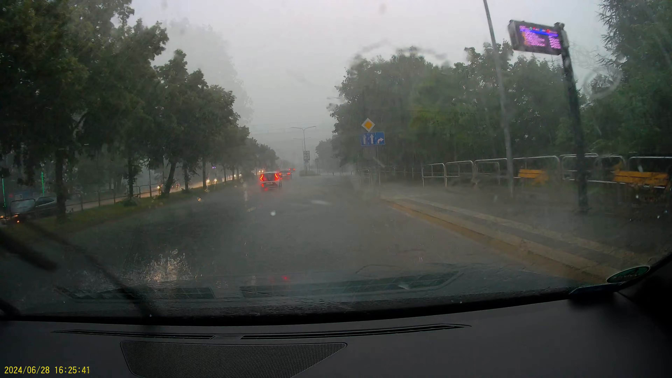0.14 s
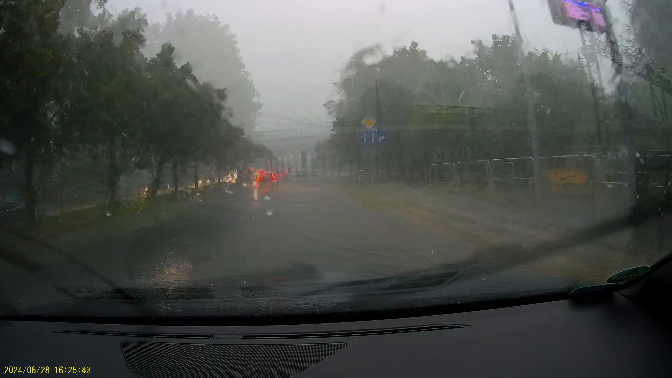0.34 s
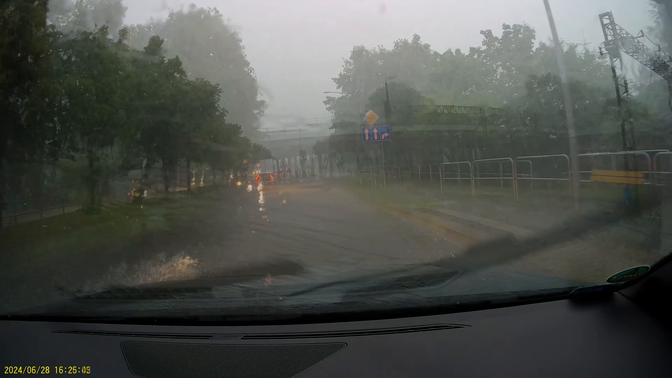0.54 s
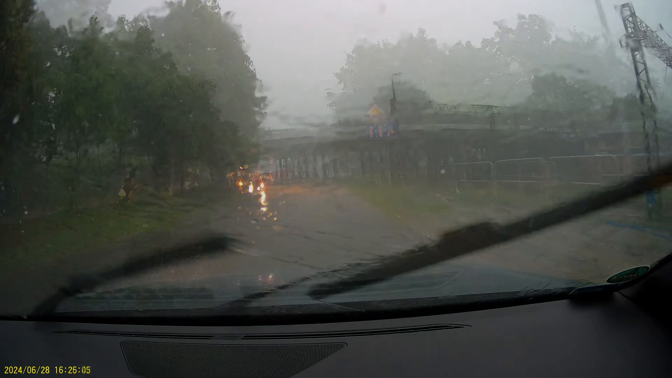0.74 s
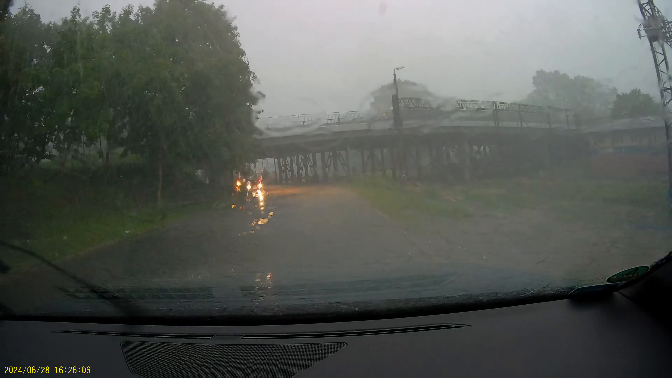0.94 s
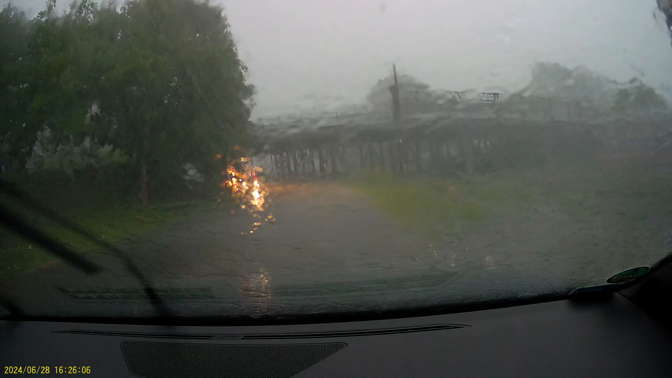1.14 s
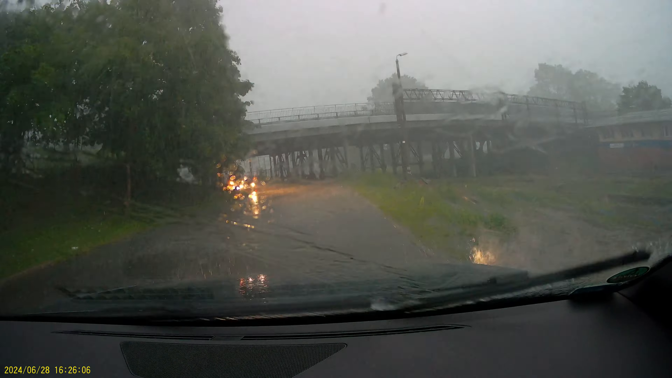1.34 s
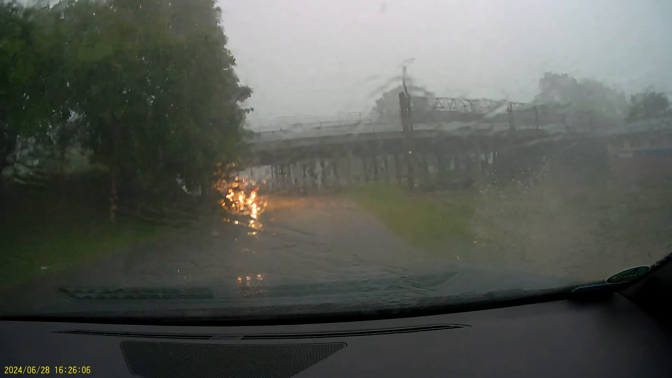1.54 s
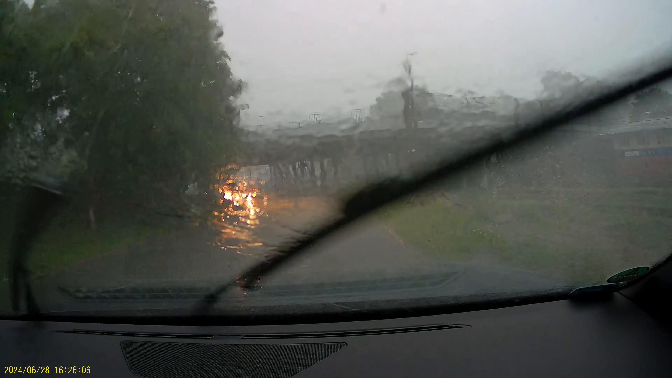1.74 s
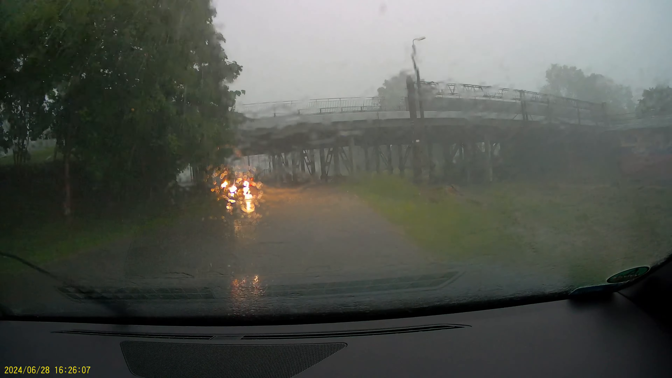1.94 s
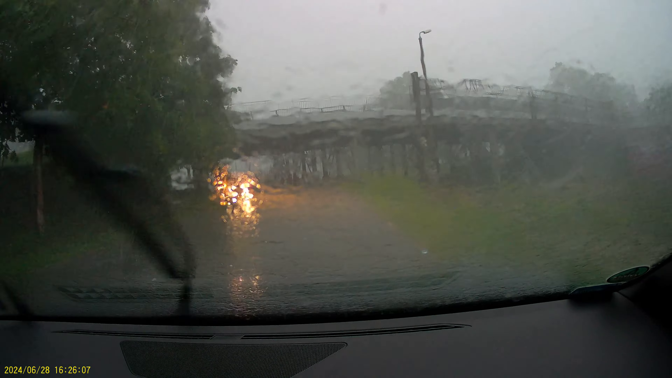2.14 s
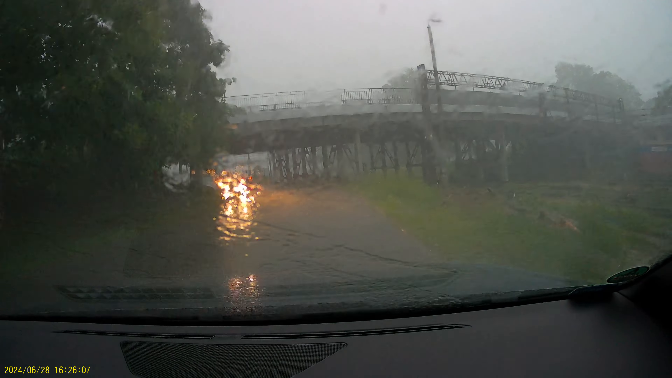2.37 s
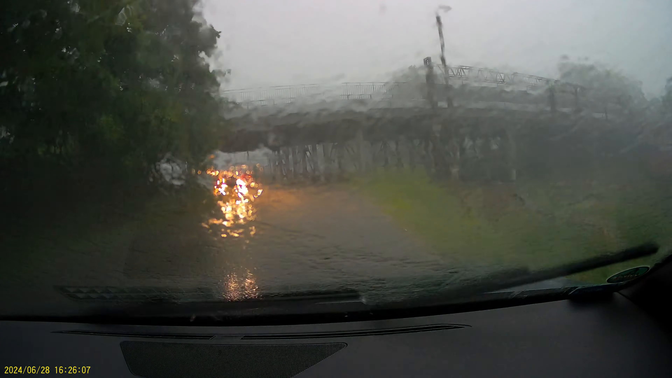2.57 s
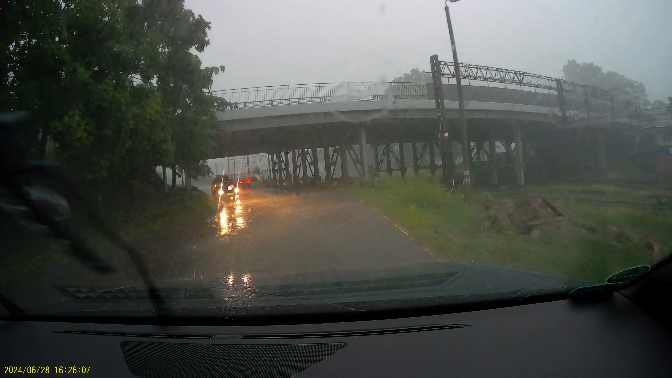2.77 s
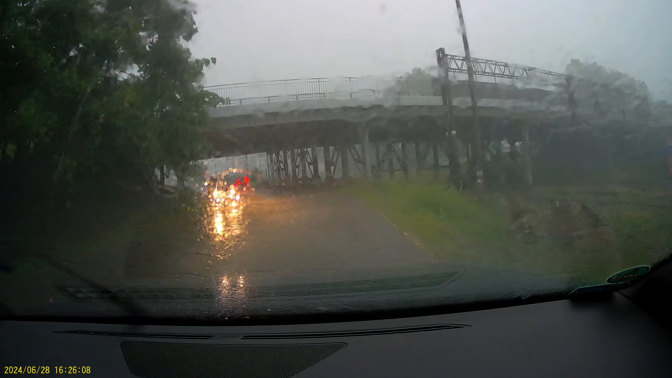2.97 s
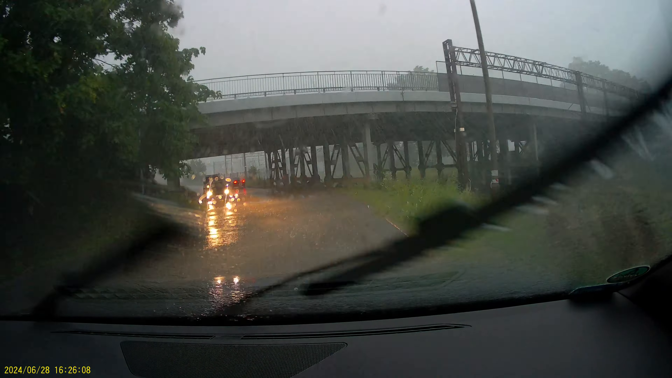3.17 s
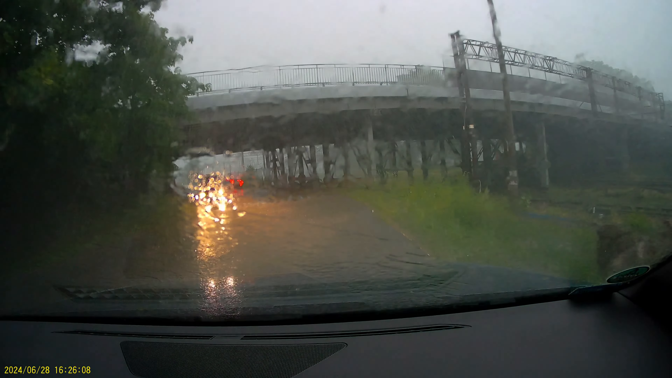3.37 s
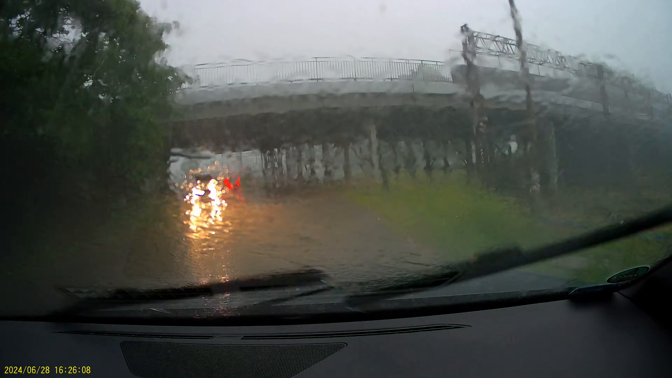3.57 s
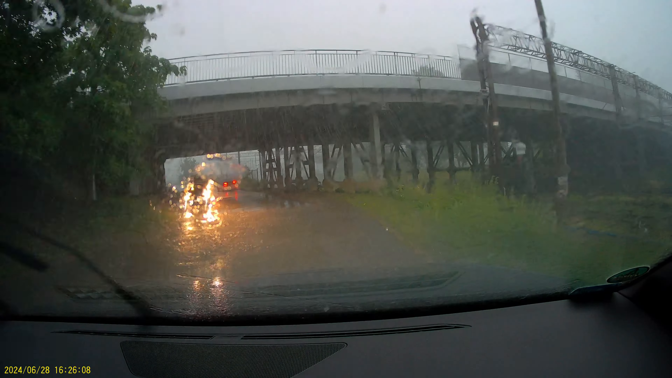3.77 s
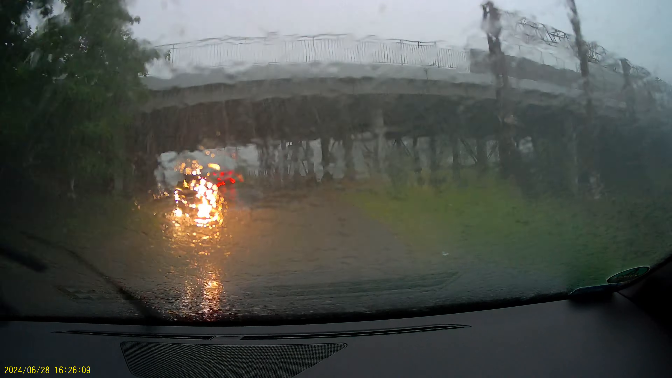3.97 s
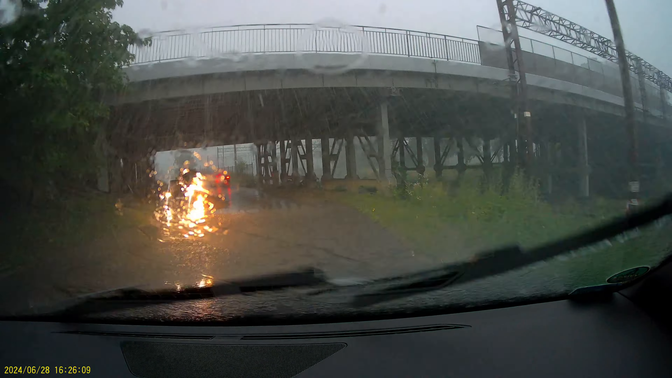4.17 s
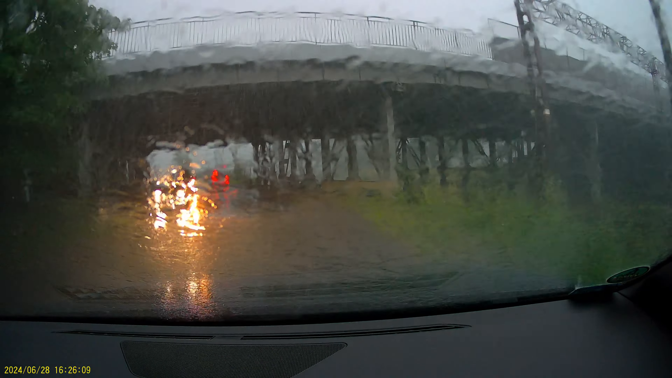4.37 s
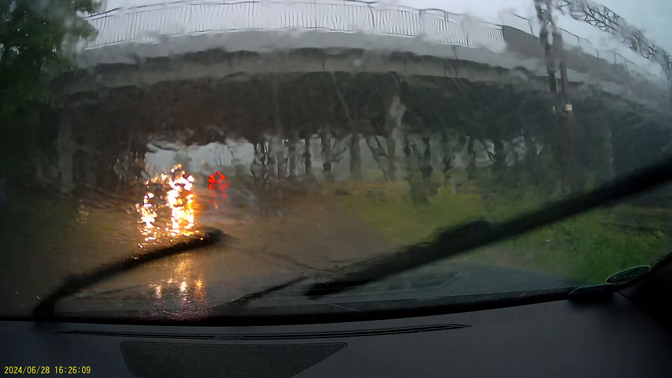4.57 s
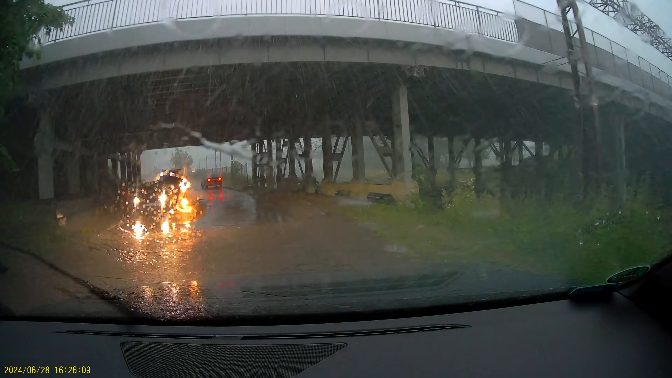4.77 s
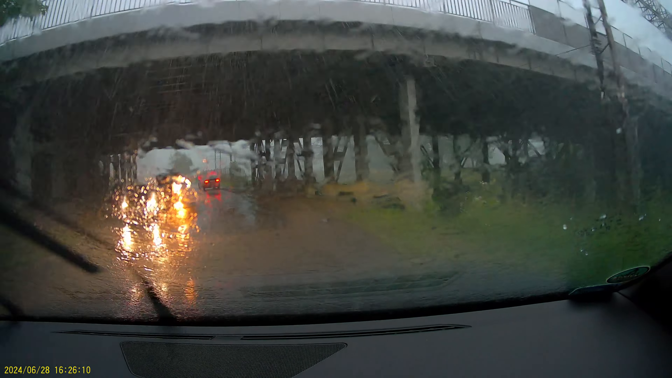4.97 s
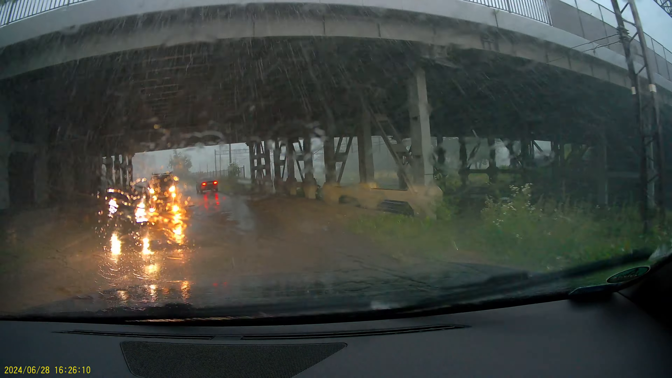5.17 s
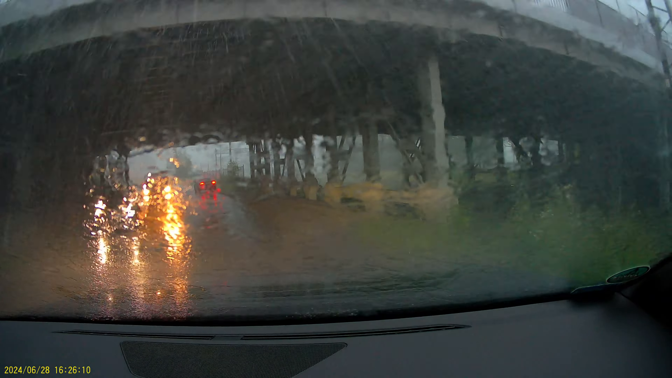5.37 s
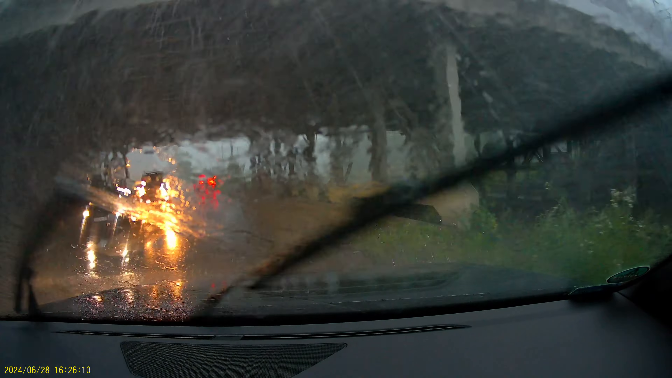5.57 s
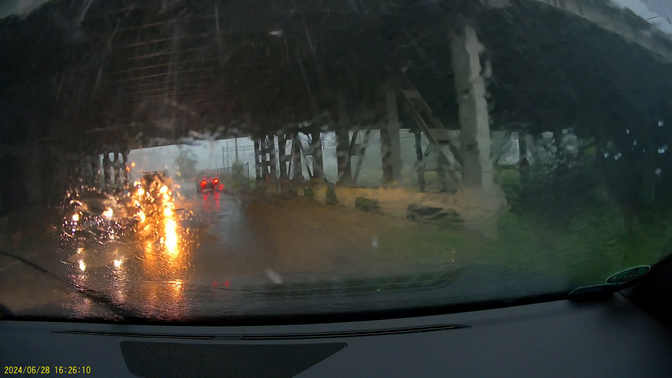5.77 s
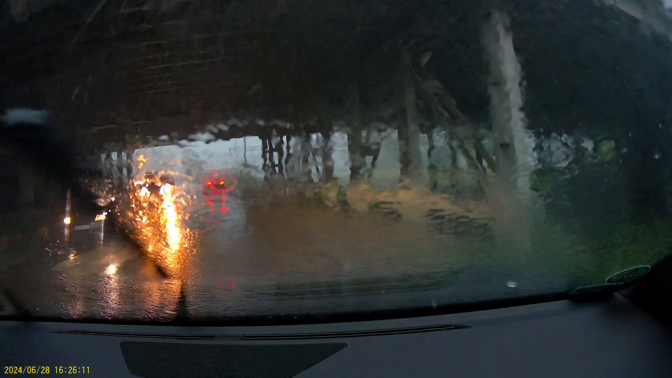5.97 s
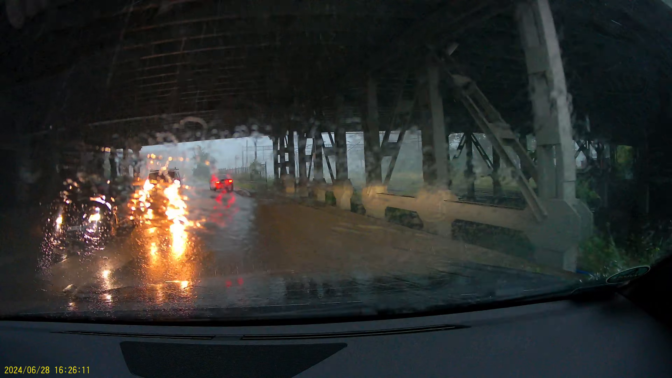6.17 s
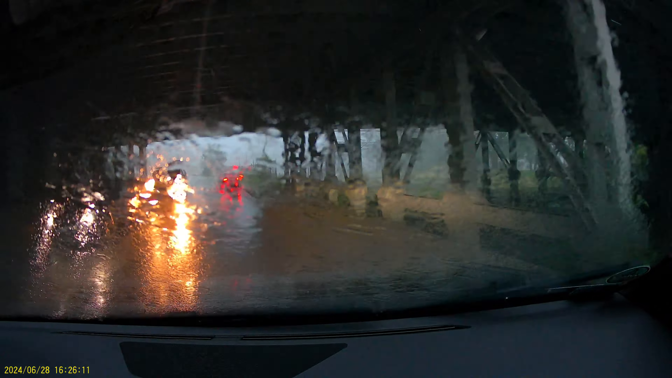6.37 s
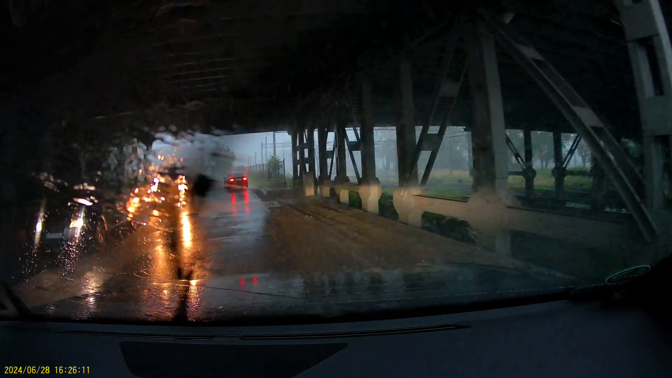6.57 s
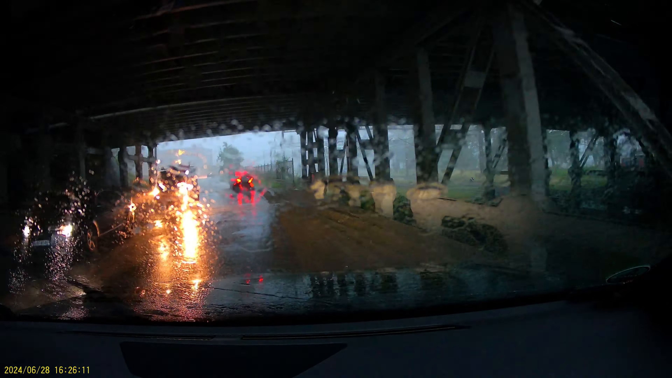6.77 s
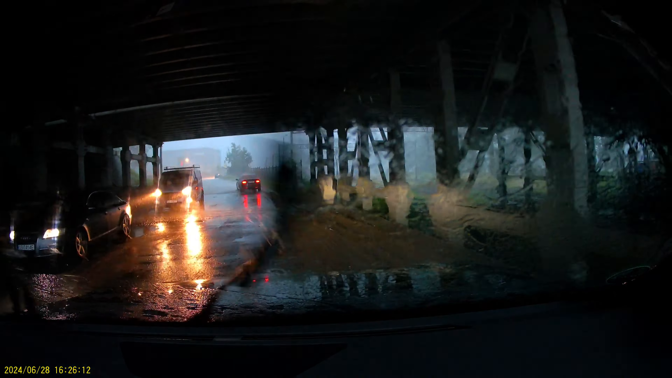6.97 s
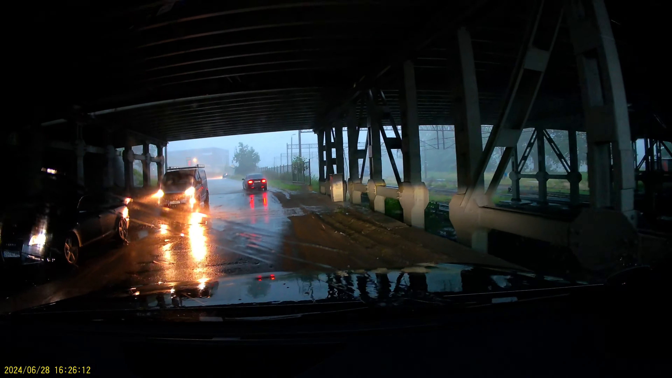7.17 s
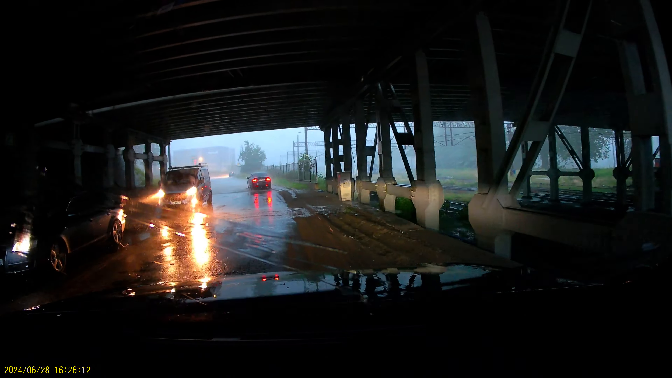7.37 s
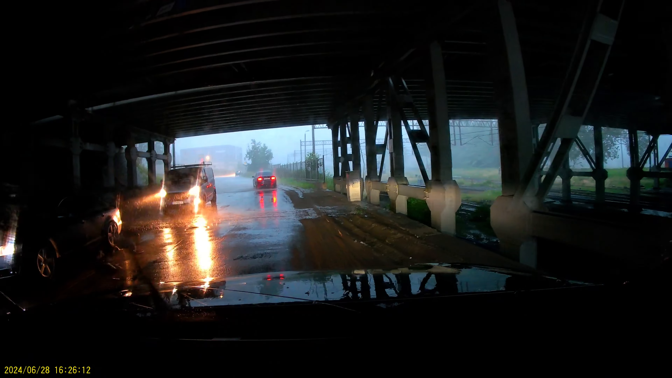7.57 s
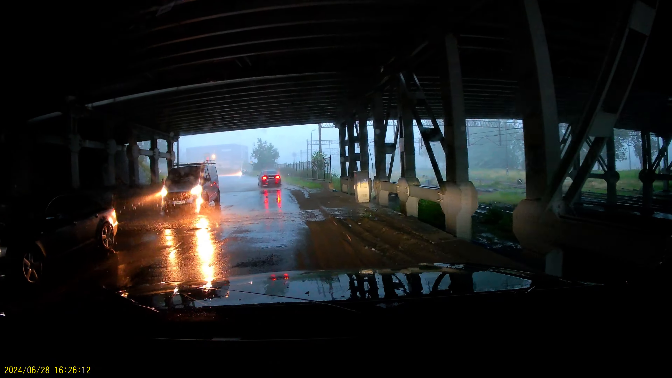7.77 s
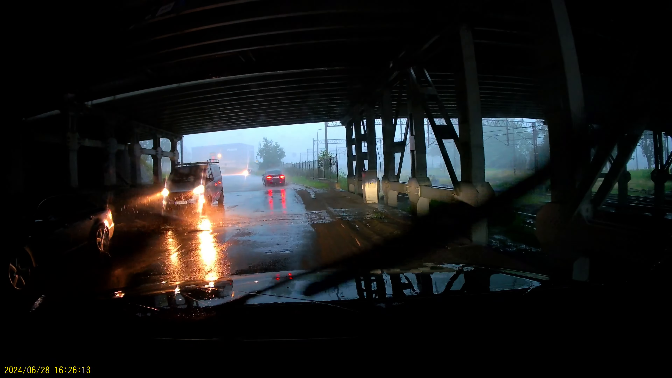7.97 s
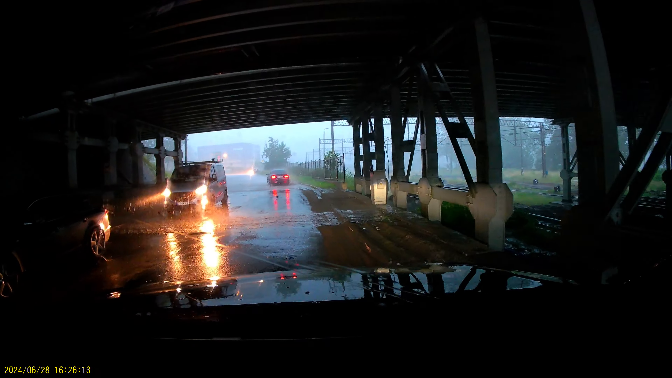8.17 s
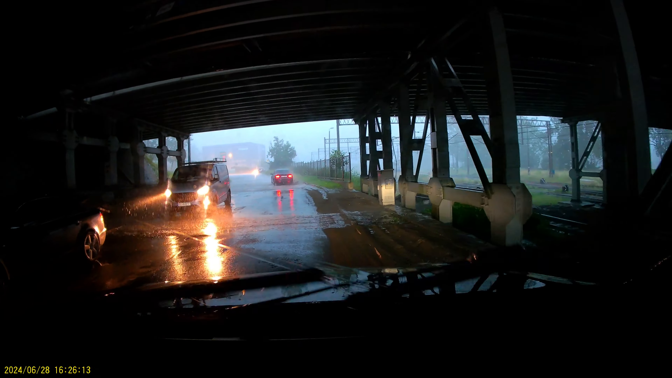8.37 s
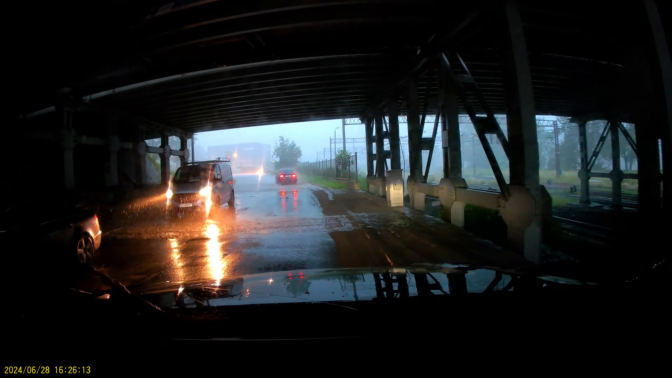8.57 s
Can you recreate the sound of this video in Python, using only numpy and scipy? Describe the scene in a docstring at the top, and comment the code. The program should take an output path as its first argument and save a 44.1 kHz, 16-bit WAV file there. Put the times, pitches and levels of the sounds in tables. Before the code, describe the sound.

Close cabin perspective: a loud continuous roar of rain on metal and glass, studded with hailstones that snap nearby or thud across the roof. Deep thunder rolls strongest in the first two seconds, over road rumble and wet tyre wash. After about seven seconds shelter overhead cuts the rain; the quiet interior exposes wipers clacking at each turn and brief squeaks on drying glass.

```python
"""Rain and hail drum on the roof and windscreen of a car driving through a storm, heard from inside:
drops and stones ring the many modes of the car shell. Thunder and road rumble boom as resonant noise,
tyres wash as shaped noise, wipers thump as decaying modes at each turn. Near the end the car rolls
under a bridge: the drumming stops, the thumps come through and the rubber squeaks on the drying glass."""
import sys
import numpy as np
from scipy import signal
from scipy.fft import rfft, irfft, next_fast_len
from scipy.io import wavfile
from scipy.ndimage import uniform_filter1d

SR = 44100
rng = np.random.default_rng(int(sys.argv[2]) if len(sys.argv) > 2 else 0)


def unload_wav(signal):
    """Save mono or channel-first audio to the path in sys.argv[1] as 16-bit WAV at rate SR, clipped to [-1, 1]."""
    wavfile.write(
        sys.argv[1],
        SR,
        np.round(np.clip(np.atleast_2d(signal).T, -1, 1) * 32767).astype(np.int16),
    )


N = 380583

# Response of the car shell heard inside: (frequency [Hz], level per Hz [dB])
SHELL_RESPONSE = [(82, -49.5), (140, -4), (218, -3), (319, -9), (383, 2), (507, -4.5), (649, -3),
                  (844, -11), (1010, -10.5), (1280, -14.5), (1740, -16), (1930, -21), (4460, -31.5),
                  (5810, -34.5), (7200, -36), (9360, -34), (15800, -120)]
# Ring of the shell modes: (frequency [Hz], T60 [s])
SHELL_DECAY = [(100, 0.16), (500, 0.24), (1500, 0.097), (6000, 0.11)]

# Rain, cut off by the bridge: (time [s], drumming on the roof [dB], patter on the glass [dB])
RAIN_LEVELS = [(0.0, -17, -27), (0.33, -23.5, -37), (0.75, -22, -33.5), (1.2, -22, -38), (1.8, -22.5, -33),
               (2.4, -24, -34), (3.2, -25.5, -37.5), (3.6, -24.5, -33.5), (3.75, -21, -32),
               (3.95, -22.5, -33), (4.23, -24, -34.5), (4.9, -24, -35.5), (5.5, -20, -31),
               (6.0, -23.5, -38), (6.6, -24, -36.5), (6.75, -24.5, -43.5), (6.88, -33, -64),
               (6.99, -30, -52), (7.08, -41.5, -58), (7.24, -43, -62), (7.43, -53.5, -65),
               (7.96, -58.5, -73.5), (8.63, -55.5, -75)]
SMALL_HAIL_PER_S, SMALL_HAIL_DB = 2.9, -20.5  # the rest of the hail, level re the roof drumming

# Wash of the wet road: (frequency [Hz], level per Hz [dB])
ROAD_SPECTRUM = [(15, -33), (25, 1), (55, -8.5), (193, -17.5), (251, -15.5), (319, -24.5), (436, -18.5),
                 (504, -30), (626, -28), (897, -49), (2500, -53.5), (4500, -58.5), (6440, -57.5),
                 (7800, -75), (10100, -84), (17200, -120)]
ROAD_DB = -38  # rms of the wash
ROAD_FADE_DB_PER_S, SHELTER_S = 2.5, 7.6  # the wash fades as the car slows under the bridge

# Road rumble and far thunder: (time [s], body boom [dB], cabin boom [dB])
RUMBLE_LEVELS = [(0.0, -30.5, -22), (0.7, -23.5, -29.5), (1.4, -18, -26), (1.8, -27, -26),
                 (2.5, -27.5, -27), (3.2, -28.5, -27), (3.6, -31.5, -31), (4.1, -26.5, -31.5),
                 (4.6, -29.5, -29.5), (5.4, -24, -28.5), (6.0, -27, -33), (6.8, -24, -30),
                 (7.2, -29.5, -34.5), (7.5, -36, -39.5), (7.851, -41, -43.5), (8.63, -43, -57.5)]
# Single booms of the body and cabin, from thunder claps and jolts of the car: # (time at its top [s], body boom
# [dB], cabin boom [dB], length [s])
BOOMS = [(0.082, -19, -28, 0.046), (0.382, -18, -39, 0.1), (0.543, -42, -22, 0.19),
         (0.973, -19.5, -17.5, 0.17), (1.167, -8, -17.5, 0.11), (1.393, -15, -12.5, 0.052),
         (1.473, -6, -20, 0.09), (1.555, -7.5, -12.5, 0.055), (1.631, -7, -37, 0.048),
         (1.937, -38, -21, 0.18), (2.225, -24, -29, 0.14), (2.602, -40, -22, 0.14),
         (2.962, -38, -19.5, 0.09), (3.12, -23, -21, 0.06), (3.843, -18, -22, 0.044),
         (4.078, -22, -46, 0.055), (4.814, -24, -26, 0.046), (5.6, -20, -37, 0.069),
         (5.846, -22, -30, 0.071), (6.276, -23.5, -27, 0.12), (6.95, -19.5, -26.5, 0.12)]
# Body and cabin resonance: (frequency [Hz], nominal width [Hz])
BOOM_RESONANCES = [(32.5, 17.6), (108, 27)]

# Modes of wiper arm and screen, lowest first: (frequency [Hz], level [dB], T60 [s])
WIPER_MODES = [(118.3, -1.5, 0.2), (178, 1.5, 0.098), (262.6, 2.5, 0.054), (353, -5, 0.061),
               (430, -5, 0.076), (566, -9.5, 0.054), (720, -16, 0.032), (1000, -22, 0.03)]
WIPE_S, FIRST_WIPE_S = .958, -.513  # one sweep out and back; start of the first
# The blades flip at both ends of a sweep: (time into the sweep [s], flip level [dB], clack re flip [dB])
WIPER_TURNS = [(0.0, -26.5, 2), (.041, -16.5, -9), (0.081, -24, -13), (0.491, -23.5, -2), (.503, -16, -6),
               (0.525, -20, -14)]
SCUFF_T60_S = .12  # the rubber scuffs as it lands, so the clack is rough
JOLT_HZ, JOLT_DB, JOLT_T60_S = 48, -6, 0.099  # each flip also jolts the body, level re flip

# Loudest hailstones: (time [s], nominal crack peak [dB], thud peak re crack [dB], tick re crack [dB],
# brightness of the tick [0-1], nearness to the listener [0-1])
HAILSTONES = [(0.063, -27, 4, -2, .8, .3), (0.137, -25, 0, 0.5, 0.62, 0.56),
              (0.176, -19.5, 14, -16, 0.37, .1), (0.252, -29, -7, -3, 0.28, 0.73),
              (0.3232, -26, 8, -20, .3, 0.37), (0.376, -13, 6.5, -21, 0.86, 0.086),
              (0.392, -19, -1, -20, 0.76, .15), (0.4572, -22, 12, -14, 0.72, .1),
              (0.513, -17.5, 5, -17, 0.21, .15), (0.5175, -21, 18, -20, .2, 0.056),
              (0.5492, -11, 10.5, -3, 0.56, 0.67), (0.603, -28, -11, 2.5, .55, 0.68),
              (0.734, -16, 2.5, -24, 0.28, .1), (0.8865, -24.5, -12, -11.5, 0.32, .1),
              (0.912, -36, 24, -17, 0.52, 0.22), (1.014, -32, 21.5, -24, .2, .1),
              (1.173, -34, 3, 3.5, .55, 0.23), (1.22, -22.5, 9, -8, 0.56, .1),
              (1.2444, -11.5, 0, -4, 0.47, 0.73), (1.463, -39, -6, 1, 0.7, .4),
              (1.482, -21, -3, -29, .4, .1), (1.599, -24.5, 2, 2, 0.02, 0.17),
              (1.7244, -21.5, 8, -15, .3, 0.51), (1.8244, -20, 9, -8, .4, 0.88),
              (1.8454, -8.5, 0.5, -13, 0.32, 0.67), (2.0244, -24, 17, -14, 0.64, .1),
              (2.1216, -28, -4, -12, .3, .4), (2.4445, -14, 4, -14, 0.58, 0.49),
              (2.5481, -3, 2.5, -18.5, 0.2, 0.66), (2.7772, -19.5, 12, -15.5, 0.31, 0.091),
              (3.14, -32, 9, -5, 0.74, .4), (3.2555, -33, 3, -14, .3, .4), (3.336, -27, 9, -6.5, .2, .3),
              (3.376, -32, 11, -18, .3, 0.44), (3.4583, -34, 20, -34, .65, 0.11),
              (3.6679, -28.5, 22, -5, 0.39, .1), (4.011, -36, -3, 2, 0.54, .4),
              (4.0253, -23, 12, -3, .1, 0.5), (4.3224, -19.5, 4.5, 1, 0.45, .7),
              (4.4093, -22, 6.5, -12, .3, 0.36), (4.4509, -19, 6, -17, .3, .4),
              (4.551, -30.5, -1, 0, 0.56, 0.38), (4.629, -22.5, 11, -8, 0.83, .6),
              (4.6916, -35, -5, -18, .1, .4), (4.737, -9.5, 10.5, -20, .05, 0.26),
              (4.7474, -14, 8, -36, 0.058, 0.064), (4.7585, -19.5, 11.5, -29, .05, .05),
              (4.8887, -12, 11.5, -21.5, 0.058, 0.11), (4.903, -11.5, 11, -37, 0.046, .05),
              (4.912, -10, 3, -17, .05, .05), (4.9175, -8.5, 6.5, -22.5, .05, 0.42),
              (4.931, -12, 7.5, -22, 0.56, .05), (5.179, -19, 4, -22, 0.93, 0.103),
              (5.2686, -32, -3, -1, 0.6, .9), (5.3999, -5.5, -1.5, -18.5, 0.02, 0.44),
              (5.5066, -17.5, 5, -18, 0.35, 0.18), (5.567, -18.5, 12.5, 1.5, 0.5, 1),
              (5.672, -15, -13, -6.5, 0.43, 0.58), (5.691, -10, 10, -18.5, 0.37, 0.11),
              (5.804, -21, -14, -23, .45, 0.09), (6.0451, -22, 10, -2.5, 0.02, 0.51),
              (6.0784, -6, 2.5, -11.5, 0.017, 0.48), (6.2177, -27, -1, -24, .3, .4),
              (6.24, -24, 1, -18, .3, .4), (6.294, -24, -2, -13, .3, .4), (6.374, -47, 23, -19, 0.29, .2),
              (6.486, -22, 16, -7, .4, 0.19), (6.6496, -22.5, 6, -25, .2, .1),
              (6.8455, -35.5, 3, 3, 0.03, 0.05), (6.8518, -24, 3, -6, .03, 0.41),
              (6.8616, -29, 4, -6, .03, .1), (6.8707, -37, 9, -7, .05, .1), (6.88, -35, 18, -12, .05, .1),
              (6.925, -35.5, 10, -13, 0.35, .2), (6.967, -27.5, -2, -13, 0.48, .05),
              (6.9767, -27, -4, -15.5, .45, 0.058), (7.129, -44.5, 17, -8, 0.38, .2),
              (7.17, -44, 14, -15, .3, .2)]
# Centres of thud, crack, tick and sizzle: (frequency [Hz])
HAIL_ZONES = [600, 1500, 3600, 5300]
CREST = 2.8  # nominal peak of a blow over the rms of its first 10 ms
ECHO_S, ECHO_DB = 0.0056, -12.5  # the sizzle comes back off the dashboard
FAR_T60_S, NEAR_T60_S = 0.33, 0.16  # extra damping by the water film, stronger on the near glass
THUD_LOW_HZ = 350  # the thud thins out below this pitch
IN_STEP = 1.07  # how strongly a near stone starts the modes in step
CONTACT_S, BUILD_S = .00015, 0.0026  # onset ramp of the nearest stone; what the farthest adds to it

# Wiper rubber squeaking: (start [s], length [s], pitch from [Hz], pitch to [Hz], top level [dB],
# flutter cutoff [Hz], steady tone re flutter [ratio])
SQUEAK_EVENTS = [(7.016, 0.4, 1160, 1173, -56.5, 36, 1.8), (7.24, 0.1, 1040, 1000, -65, 66, .6),
                 (7.233, 0.21, 1160, 1230, -50.5, 82, 0.54), (7.388, 0.187, 1260, 1320, -62, 99, .3),
                 (7.589, 0.13, 874, 810, -54, 20, 2.2), (7.684, 0.13, 810, 854, -49, 32, 1.7),
                 (7.956, 0.077, 835, 890, -61, 20, 2.6)]
WAVER_HZ, WAVER_CUTOFF_HZ = 7, 15  # rms wander of the squeak's pitch; how fast it wanders

CUTOFF_HZ = 8500  # the top is cut from here


def amp(db):
    """dB to gain."""
    return 10 ** (np.asarray(db) / 20)


def rms_one(x):
    """Scale to rms 1."""
    return x / np.sqrt(np.mean(x ** 2) + 1e-20)


def in_time(rows):
    """Draw the level curves sample by sample."""
    s, *columns = np.transpose(rows)
    return [np.interp(np.arange(N) / SR, s, c) for c in columns]


def at_hz(points, hz):
    """Read a spectrum on a log frequency axis."""
    point_hz, values = np.array(points).T
    return np.interp(np.log(hz), np.log(point_hz), values)


def resonate(x, hz, width_hz):
    """Two-pole resonance, gain about 1 on top."""
    r = np.exp(-np.pi * width_hz / SR)
    top_gain = (1 - r * r) / 2
    poles = [1, -2 * r * np.cos(2 * np.pi * hz / SR), r * r]
    return signal.lfilter(top_gain * np.array([1, 0, -1]), poles, x)


def shell_modes(count=600):
    """Pitches and rings of the many modes of roof and glass, denser in the bass."""
    hz = (np.linspace(11, 90, count) + rng.uniform(-.062, .062, count)) ** 2
    t60 = np.clip(at_hz(SHELL_DECAY, hz), .01, .4)
    t = np.arange(SR // 5) / SR
    # allow for mode spacing and ring time, so that energy per Hz follows the response
    height = amp(at_hz(SHELL_RESPONSE, hz)) * np.sqrt(np.sqrt(hz) / t60)
    rings = np.sin(2 * np.pi * np.outer(hz, t)) * amp(-60 * t / t60[:, None])
    return hz, height[:, None] * rings


def drops(hz, rings, share, per_s, spread_db, count=8):
    """Drops land at random on several spots; each spot shakes the modes in its own mix."""
    spots = (rng.standard_normal((count, len(hz))) * share) @ rings
    landed = rng.random(N) < per_s / SR
    sizes = amp(spread_db * np.minimum(rng.exponential(1, N), 4)) * landed
    dealt = rng.integers(0, count, N)
    patter = sum(signal.oaconvolve(sizes * (dealt == k), spots[k])[:N] for k in range(count))
    return rms_one(patter)


def rain(hz, rings):
    """The lined roof drums dull, the bare glass patters bright; small stones knock in between."""
    roof_db, glass_db = in_time(RAIN_LEVELS)
    dull = 1 / np.sqrt(1 + (hz / 1500) ** 4)
    bright = np.sqrt(1 - dull ** 2)
    roof = drops(hz, rings, dull, per_s=600, spread_db=2.5)
    glass = drops(hz, rings, bright, per_s=1100, spread_db=3.0, count=15)
    stones = drops(hz, rings, 1, SMALL_HAIL_PER_S, spread_db=1.5)
    return amp(roof_db) * (roof + amp(SMALL_HAIL_DB) * stones) + amp(glass_db) * glass


def road():
    """Wash of tyres on the wet road and of rain farther off: noise shaped in frequency."""
    size = next_fast_len(N)
    hz = np.maximum(np.arange(size // 2 + 1) * SR / size, 1)
    spectrum = rfft(rng.standard_normal(size)) * amp(at_hz(ROAD_SPECTRUM, hz))
    wash = rms_one(irfft(spectrum, size)[:N])
    fade_db = ROAD_FADE_DB_PER_S * np.maximum(np.arange(N) / SR - SHELTER_S, 0)
    return amp(ROAD_DB - fade_db) * wash


def rumble():
    """Noise rings the two big resonances of the car; its own fading is partly evened out."""
    out, t = 0, np.arange(N) / SR
    claps = 0
    for s, body_db, cabin_db, length in BOOMS:
        claps = claps + amp([[body_db], [cabin_db]]) * np.exp(-(2 * (t - s) / length) ** 2)
    levels = np.hypot(amp(in_time(RUMBLE_LEVELS)), claps)
    for level, (hz, width) in zip(levels, BOOM_RESONANCES):
        boom = rng.standard_normal(N)
        for _ in range(2):  # each pass is wider, as two in a row narrow the peak
            boom = resonate(boom, hz, 1.39 * width)
        boom = rms_one(boom)
        swell = np.sqrt(uniform_filter1d(boom ** 2, round(2 * SR / hz)) + 0.61)
        out = out + level * rms_one(boom / swell)
    return out


def wiper_flips():
    """A soft blow: the lowest mode thumps, the higher ones of arm and screen clack."""
    t, out = np.arange(SR // 4) / SR, np.zeros(N + SR // 4)
    modes = np.array([amp(db - 60 * t / t60) * np.sin(2 * np.pi * hz * t) for hz, db, t60 in WIPER_MODES])
    jolt = amp(JOLT_DB - 60 * t / JOLT_T60_S) * np.sin(2 * np.pi * JOLT_HZ * t)
    thump = (modes[0] - jolt) * np.minimum(t / 0.0033, 1)
    scuff_fade = amp(-60 * t[:SR // 20] / SCUFF_T60_S)
    for start in np.arange(FIRST_WIPE_S, N / SR, WIPE_S):
        for into_s, db, clack_db in WIPER_TURNS:
            s = start + into_s
            if not 0 < s < N / SR:
                continue
            mix_db = rng.normal(0, 2.0, len(modes) - 1)  # every clack differs a little
            scuff = rng.standard_normal(len(scuff_fade)) * scuff_fade
            scuff = scuff / np.sqrt(np.sum(scuff ** 2))
            clean_clack = amp(clack_db + mix_db) @ modes[1:] * np.minimum(t / 0.0034, 1)
            clack = signal.fftconvolve(clean_clack, scuff)[:len(t)]
            out[round(s * SR):][:len(t)] += amp(db) * (thump + clack)
    return out[:N]


def hail(hz, rings):
    """Stones strike the shell modes, each at its own spot: near ones snap, far ones swell through the roof."""
    out, t = np.zeros(N + rings.shape[1]), np.arange(rings.shape[1]) / SR
    lag = round(ECHO_S * SR)
    # the zones fade into each other
    shares = [np.interp(np.log(hz), np.log(HAIL_ZONES), row) for row in np.eye(4)]
    shares[0] = shares[0] / np.sqrt(1 + (THUD_LOW_HZ / hz) ** 4)
    for s, db, thud_db, tick_db, bright, near in HAILSTONES:
        bright, near = np.clip([bright, near], 0, 1)
        mix = rng.standard_normal(len(hz)) - IN_STEP * near  # modes in step give a sharp first pulse
        zones = (mix * shares) @ rings
        thud, crack, tick, sizzle = (z / np.sqrt(np.mean(z[:SR // 100] ** 2)) for z in zones)
        body = (amp(thud_db) * thud + crack) / CREST
        sizzle = sizzle + amp(ECHO_DB) * np.r_[np.zeros(lag), sizzle[:-lag]]
        top = amp(tick_db) * ((1 - bright) * tick + bright * sizzle)
        fade = amp(-60 * t / (FAR_T60_S + (NEAR_T60_S - FAR_T60_S) * near))
        build_s = BUILD_S * (1 - near) ** 3
        soft = fade * np.minimum(t / (build_s + CONTACT_S), 1)
        hard = fade * np.minimum(t / (build_s + 1 / SR), 1)
        out[round(s * SR):][:len(body)] += amp(db) * (soft * body + hard * top)
    return out[:N]


def slow_noise(cutoff_hz):
    """Low-passed noise of rms 1, for slow random movement."""
    lowpass = signal.butter(2, cutoff_hz, fs=SR, output="sos")
    return rms_one(signal.sosfilt(lowpass, rng.standard_normal(N)))


def wiper_squeaks():
    """Stick-slip of the rubber: a narrow noisy tone that glides, swelling and fading."""
    out, t = np.zeros(N), np.arange(N) / SR
    for start, length, from_hz, to_hz, db, flutter_hz, steady in SQUEAK_EVENTS:
        way = np.clip((t - start) / length, 0, 1)
        pitch = from_hz + (to_hz - from_hz) * way + WAVER_HZ * slow_noise(WAVER_CUTOFF_HZ)
        carrier = np.exp(2j * np.pi * np.cumsum(pitch) / SR)
        flutter = steady + slow_noise(flutter_hz) + 1j * slow_noise(flutter_hz)
        swell = (4 * way * (1 - way)) ** 0.39
        out += amp(db) * swell * rms_one(np.real(carrier * flutter))
    return out


def scene():
    """Everything heard in the cabin."""
    hz, rings = shell_modes()
    storm = rain(hz, rings) + hail(hz, rings)
    car = road() + rumble() + wiper_flips() + wiper_squeaks()
    return (storm + car)[None]


def record(dry):
    """Peaks are rounded just below full scale, then the top is cut."""
    ceiling = .97
    rounded = dry / (1 + np.abs(dry / ceiling) ** 6) ** (1 / 6)
    return signal.sosfilt(signal.cheby2(10, 60, CUTOFF_HZ, fs=SR, output="sos"), rounded)


dry = scene()
out = record(dry)
unload_wav(out)
```